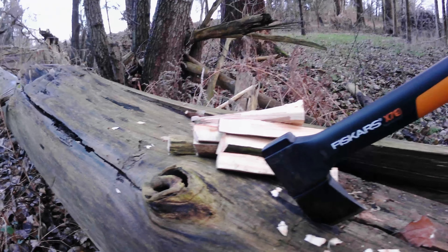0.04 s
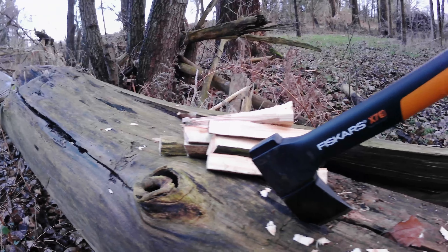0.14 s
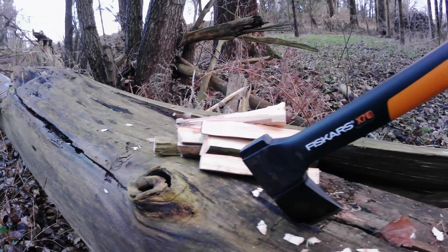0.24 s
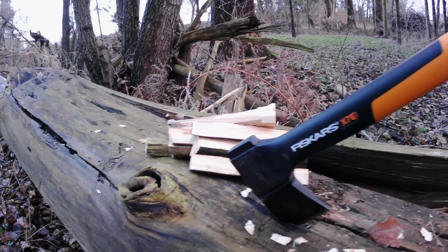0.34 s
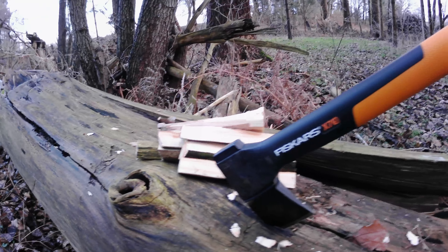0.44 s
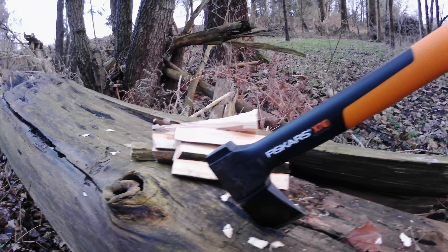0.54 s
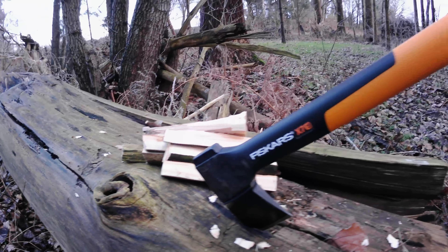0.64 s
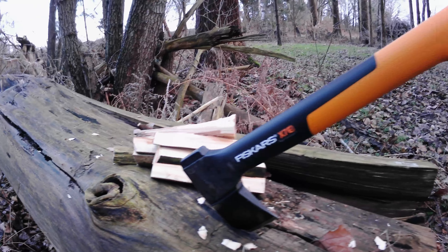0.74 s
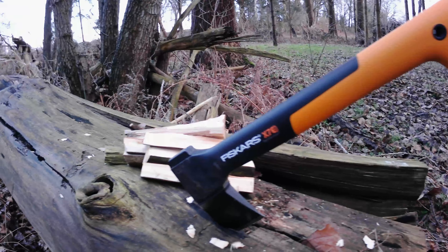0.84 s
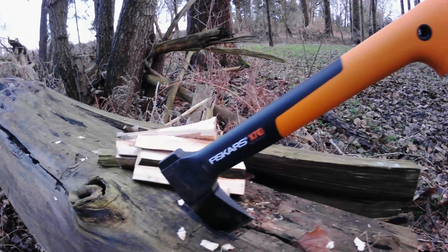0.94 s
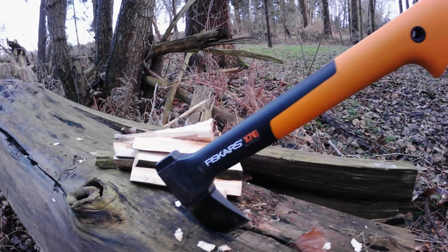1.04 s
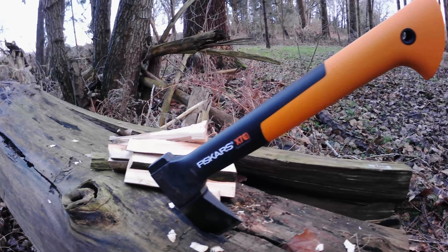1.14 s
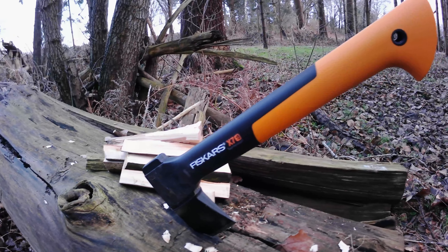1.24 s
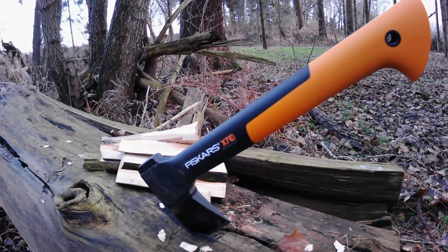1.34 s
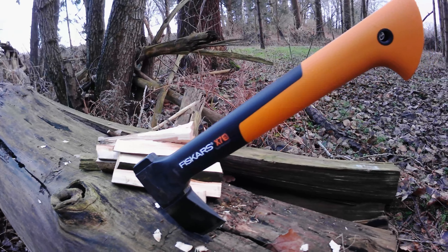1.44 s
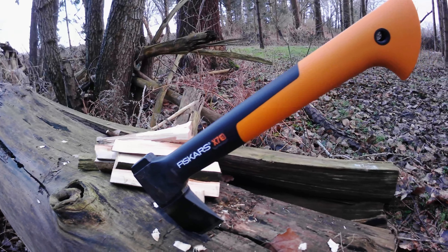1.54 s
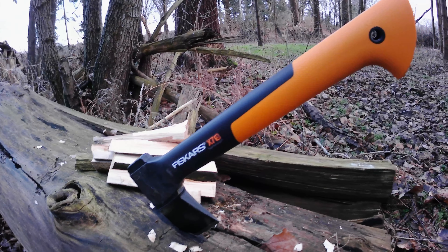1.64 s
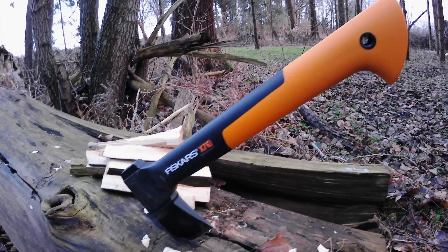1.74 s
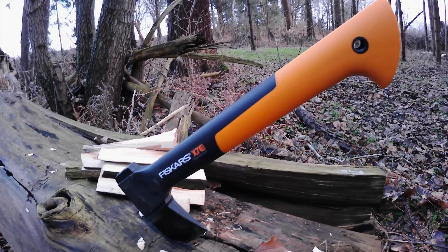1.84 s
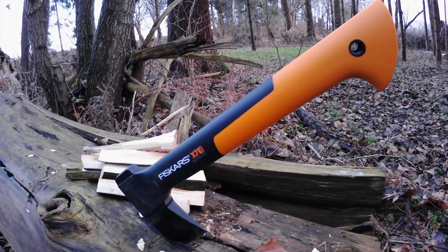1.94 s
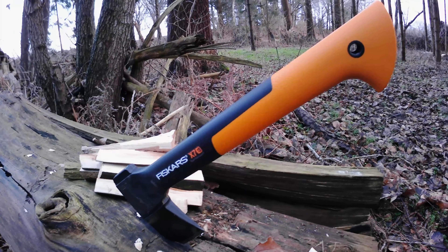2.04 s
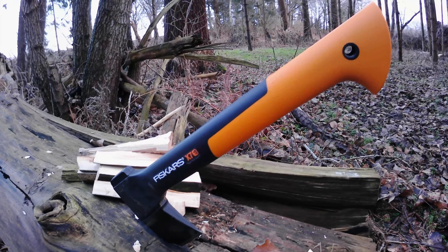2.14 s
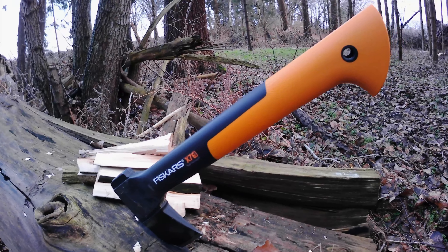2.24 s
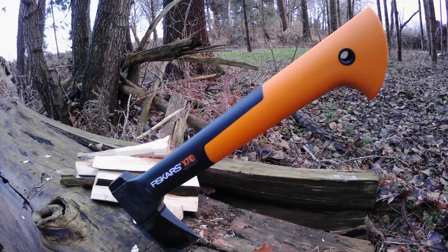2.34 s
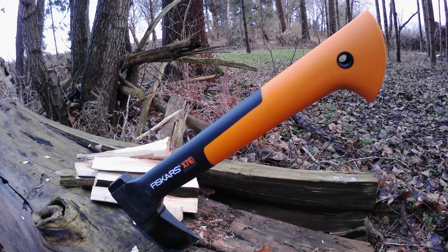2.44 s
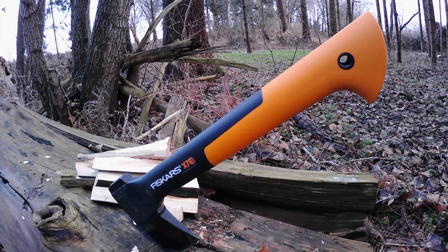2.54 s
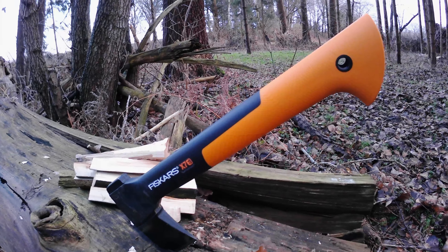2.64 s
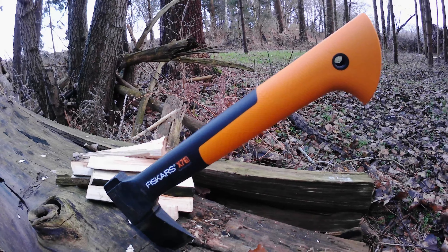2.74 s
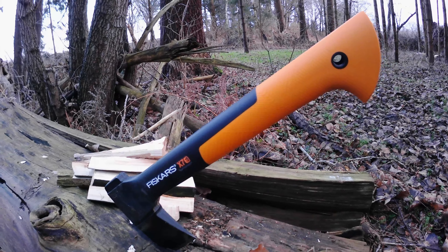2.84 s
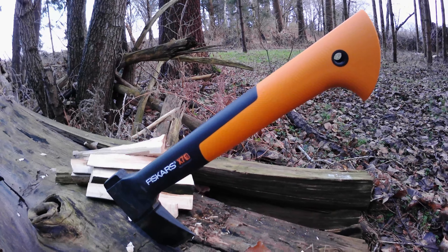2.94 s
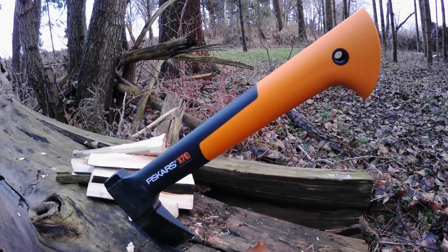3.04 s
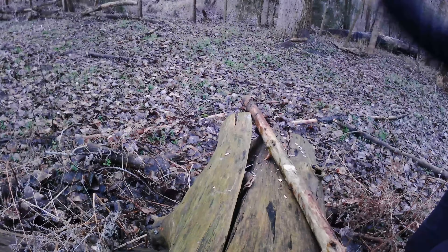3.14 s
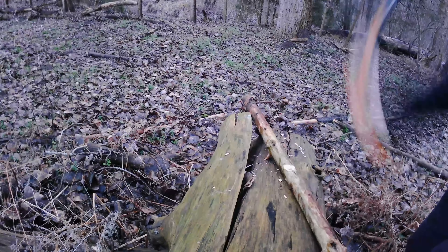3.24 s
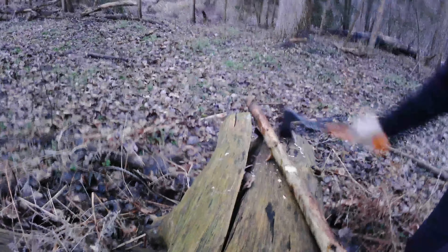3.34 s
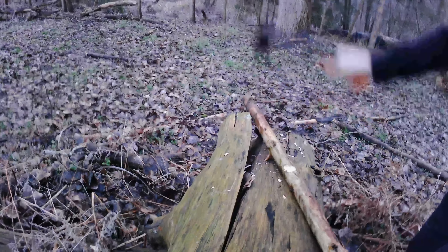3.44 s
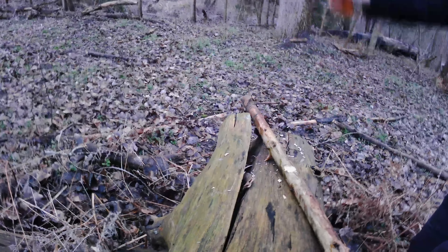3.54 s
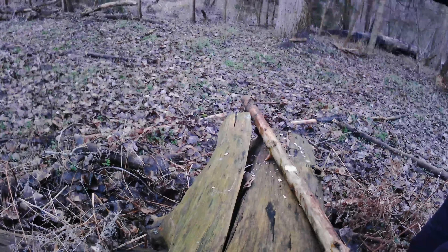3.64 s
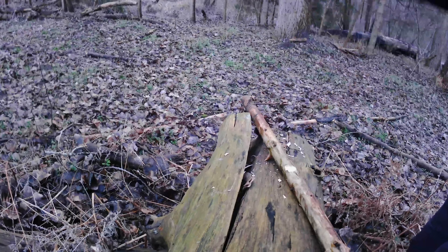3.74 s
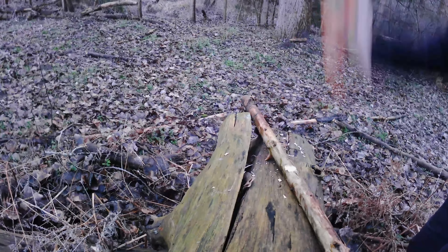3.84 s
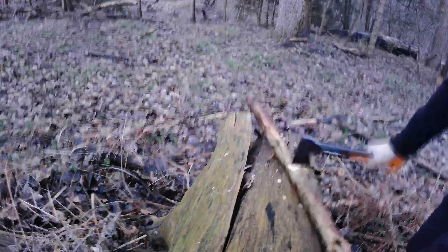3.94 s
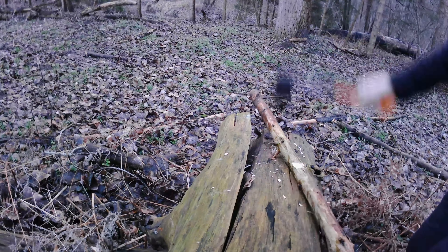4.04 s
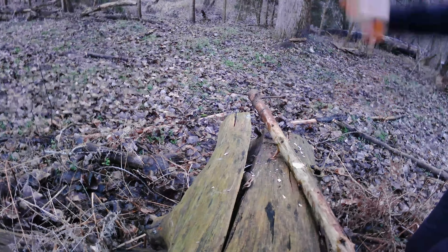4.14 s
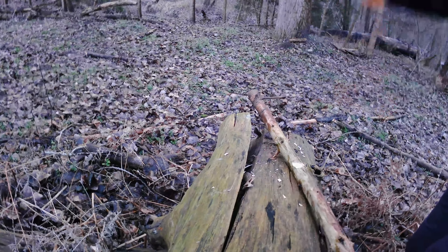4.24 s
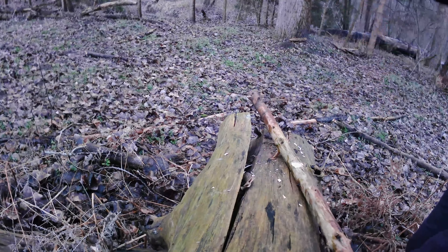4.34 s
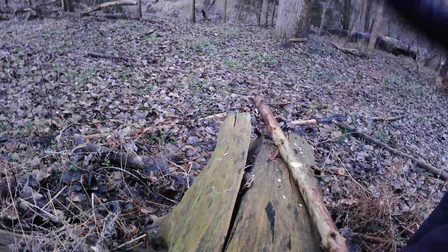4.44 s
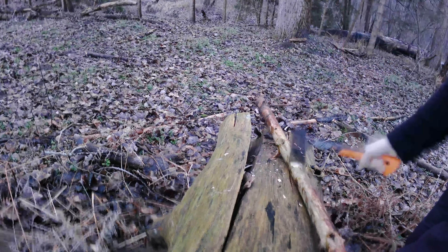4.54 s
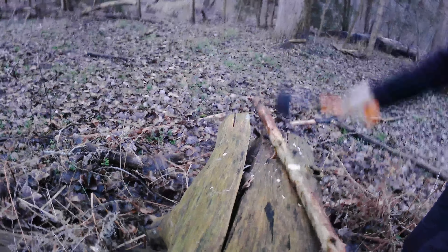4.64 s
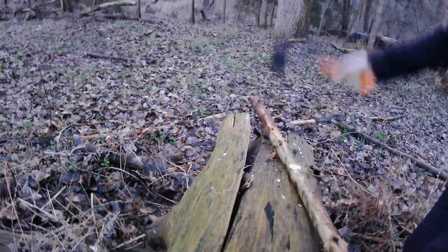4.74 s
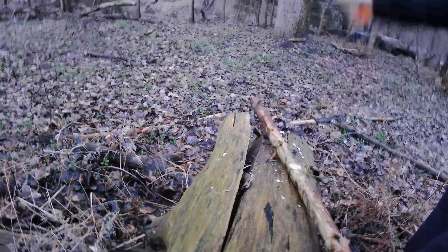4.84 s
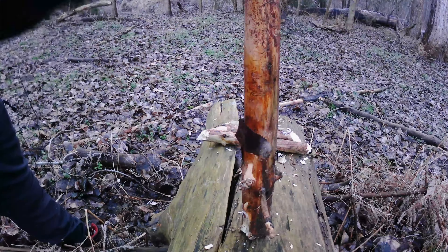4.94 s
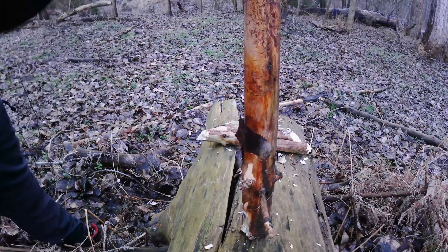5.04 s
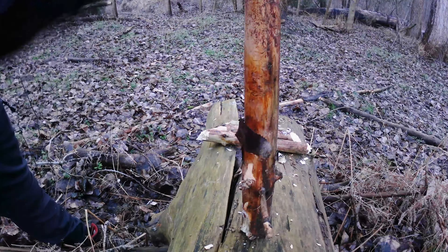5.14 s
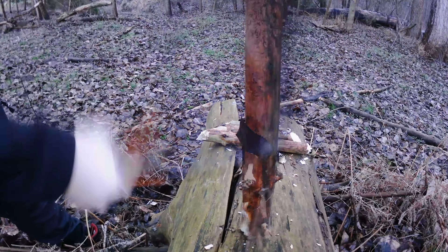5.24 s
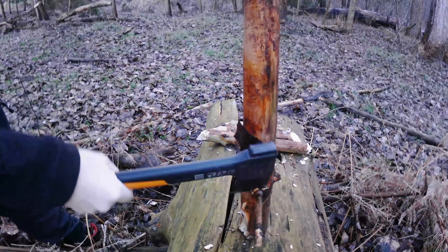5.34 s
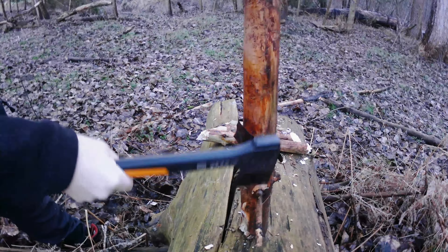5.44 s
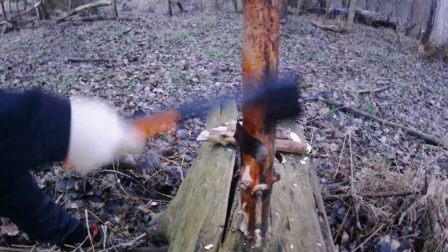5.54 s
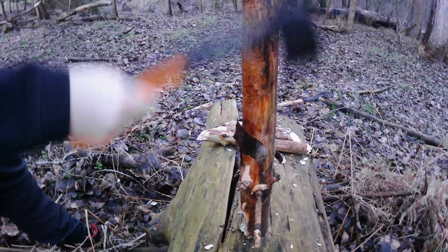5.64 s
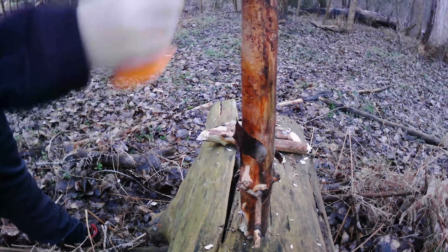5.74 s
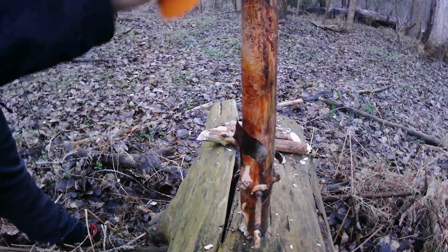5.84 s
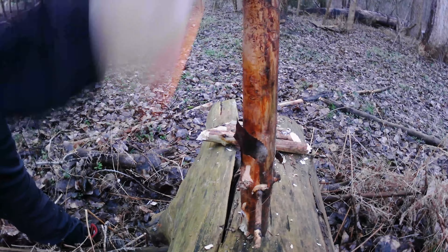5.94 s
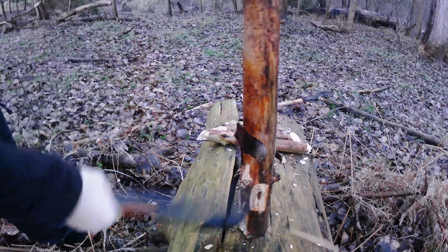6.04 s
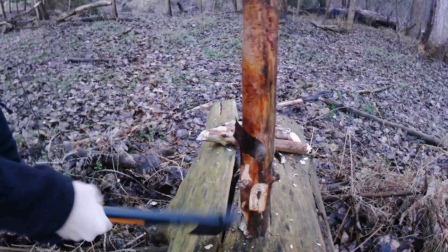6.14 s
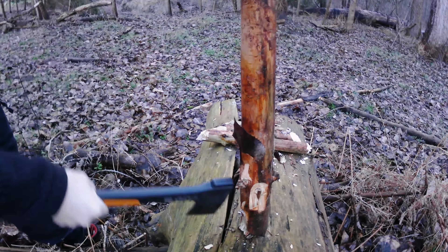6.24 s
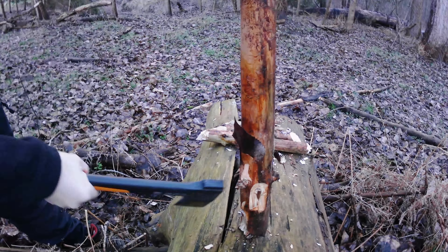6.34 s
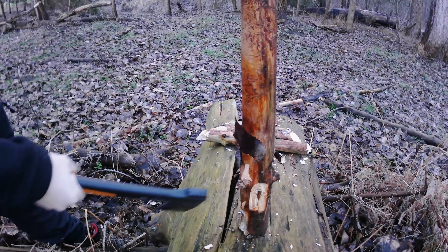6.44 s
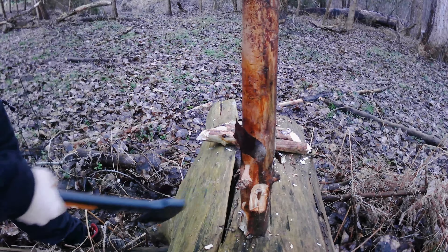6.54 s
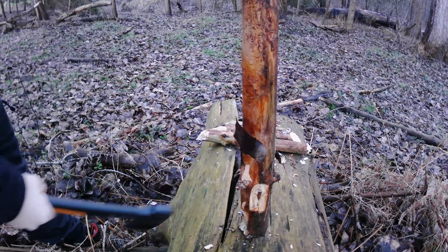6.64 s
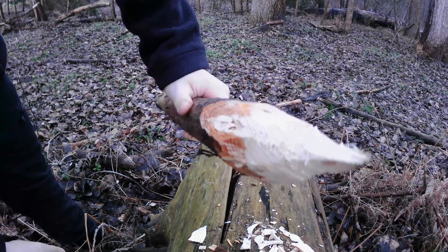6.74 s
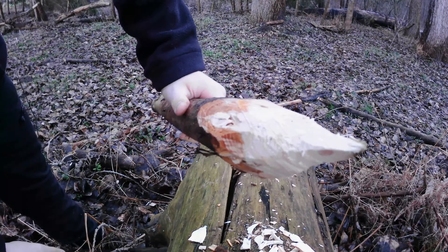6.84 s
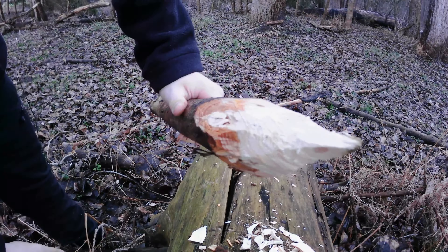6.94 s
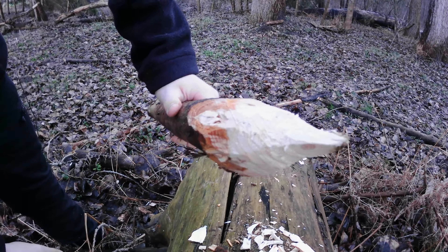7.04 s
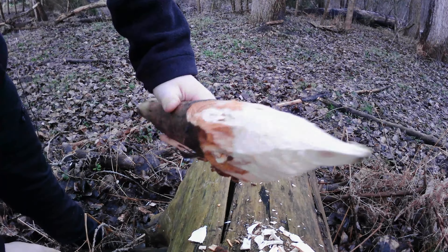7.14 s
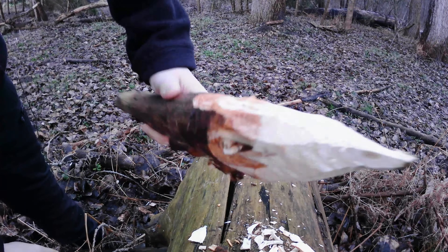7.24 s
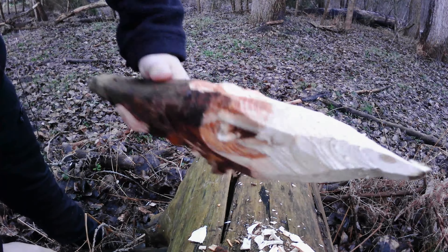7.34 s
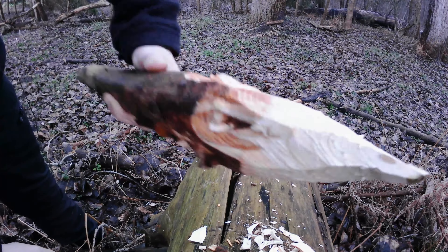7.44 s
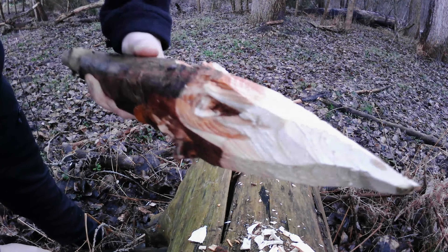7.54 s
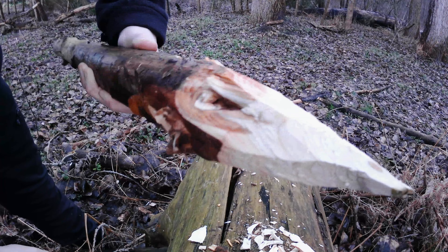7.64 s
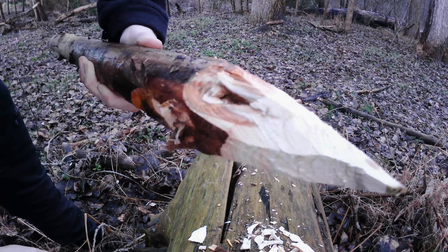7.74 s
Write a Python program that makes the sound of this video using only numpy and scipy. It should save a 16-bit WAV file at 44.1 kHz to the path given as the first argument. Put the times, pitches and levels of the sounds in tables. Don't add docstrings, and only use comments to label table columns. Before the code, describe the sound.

Faint outdoor hiss and a thin bird chirp, a sharp twig crack, brief silence, then hatchet blows on wood with clattering chips and a distant engine drone.

```python
import sys
import numpy as np
from scipy import signal
from scipy.fft import rfft, irfft
from scipy.io import wavfile
from scipy.ndimage import uniform_filter1d

SR = 44100
rng = np.random.default_rng(int(sys.argv[2]) if len(sys.argv) > 2 else 0)


def master_out(mix):
    frames = np.transpose(np.atleast_2d(mix))
    ceiling = np.clip(frames, -1, 1)
    pcm = np.round(ceiling * 32767).astype(np.int16)
    wavfile.write(sys.argv[1], SR, pcm)


def to_linear_factor(level_db):
    exponent = np.asarray(level_db, float) / 20
    return 10 ** exponent


N = 343759
T = np.arange(N) / SR

KNOCK_CRACK_T60_S = 0.019
# start in seconds, force in dB, push in ms, bite in ms, fibre crack in dB.
CHOPS = [
    (3.2759, 7.006, 0.54, 5.7, -4.5),
    (3.9276, 5, 0.73, 5.1, -10),
    (4.5764, 6.993, 0.45, 7.4, -2.5),
]


def decay(t, t60):
    return np.exp(-np.log(1000) * t / t60)


def coloured(size, spectrum):
    hz, db = np.transpose(spectrum)
    log_hz = np.log(np.fft.rfftfreq(size, 1 / SR) + 1)
    gain = to_linear_factor(np.interp(log_hz, np.log(hz), db))
    x = irfft(rfft(rng.standard_normal(size)) * gain, size)
    return x / x.std()


def add(out, s, sound):
    i = int(s * SR)
    out[i:i + len(sound)] += sound[:N - i]


def walk(rate):
    k = int(SR / rate)
    held = np.repeat(rng.standard_normal(N // k + 1), k)
    return 1.3 * uniform_filter1d(uniform_filter1d(held, k), k)[:N]


def tone(rows, harmonic, db_column):
    rows = np.transpose(rows)
    edge = np.clip(np.minimum(T - rows[0, 0], rows[0, -1] - T) / 0.015, 0, 1)
    phase = 2 * np.pi * np.cumsum(np.interp(T, rows[0], rows[1])) / SR
    level = np.sqrt(2) * edge * to_linear_factor(np.interp(T, rows[0], db_column))
    return level * np.sin(harmonic * phase)


def air():
    # frequency in Hz, level in dB per Hz.
    hiss_colour = [(12, -51.5), (20, -18), (55, -10), (96, -7), (172, -8.5), (261, -2.5), (420, -7.5),
                   (918, -7.5), (1480, -10.5), (2370, -27), (3220, -31), (5500, -37.5), (11700, -42.5),
                   (12600, -81)]
    # frequency in Hz, level in dB.
    wash_colour = [(20, -23.5), (50, -1), (110, 4), (190, 7), (300, -7.5), (500, -42), (2000, -90.5)]
    # start in seconds, level in dB.
    takes = [
        (0, -57),
        (3.1, -57),
        (4.961, -51),
        (6.78, -52),
    ]
    # centre in seconds, change in dB, half-width in seconds.
    swells = [
        (3.38, 10, 0.13),
        (4.1, 7, 0.13),
        (4.62, -2, .15),
        (6.5, 6, 0.17),
    ]
    starts, levels_db = np.transpose(takes)
    wash_db = levels_db[(np.searchsorted(starts, T) - 1).clip(0)]
    wash_db = wash_db + sum(db * np.exp(-((T - s) / width) ** 2) for s, db, width in swells)
    wash = coloured(N, wash_colour) * to_linear_factor(wash_db - 4.5 + 1.8 * walk(9.1))
    hiss = coloured(N, hiss_colour) * to_linear_factor(-50.13 + 0.15 * walk(0.42))
    return hiss + wash


def whine():
    # frequency in Hz, level in dB.
    comb = [(2825, -78), (4246, -83), (5652, -87), (7073, -83), (8490, -93), (9898, -87), (11319, -91)]
    clock = np.cumsum(1 + .0003 * walk(4)) / SR
    throb = 1 + .3 * np.exp(2j * np.pi * 17.5 * T)
    out = np.zeros(N)
    for hz, db in comb:
        level = np.sqrt(2) * to_linear_factor(db + .8 * walk(30))
        out += level * (throb * np.exp(2j * np.pi * hz * clock)).imag
    return out


def drones():
    # time in seconds, level in dB, third harmonic in dB.
    near_path = [
        (4.96, -44.5, -70),
        (5.23, -45, -63),
        (5.32, -54, -61.5),
        (5.55, -48, -54.5),
        (5.85, -47.5, -81),
        (6.29, -50.5, -62),
        (6.34, -44, -55.5),
        (6.59, -46, -49),
        (6.78, -39, -53.5),
    ]
    # time in seconds, pitch in Hz, level in dB.
    far_path = [
        (6.85, 188.8, -64.5),
        (7.1, 188, -55.5),
        (7.25, 188, -59.5),
        (7.6, 176.2, -63),
        (7.75, 184.6, -58.5),
    ]
    s, db, third_db = np.transpose(near_path)
    pitch_hz = 120 + 0.4 * rng.standard_normal(len(s))
    rows = np.transpose([s, pitch_hz])
    near = tone(rows, 1, db) + tone(rows, 3, third_db)
    far = tone(far_path, 1, np.transpose(far_path)[-1])
    return near * to_linear_factor(1.2 * walk(30)) + far * to_linear_factor(2.99 * walk(15))


def bird():
    # start in seconds, length in seconds, first pitch in Hz, last pitch in Hz, level in dB.
    calls = [
        (2.027, .02, 3540, 4200, -66),
        (2.056, 0.077, 3650, 4300, -57),
        (.39, .04, 5000, 5000, -76),
        (2.195, .045, 5000, 5000, -74),
    ]
    rise_s, sag_hz_per_s = 0.0117, 3500
    out = np.zeros(N)
    for s, length, first_hz, last_hz, db in calls:
        path = [(s, first_hz),
                (s + rise_s, (first_hz + last_hz) / 2),
                (s + 2 * rise_s, last_hz),
                (s + max(length, 2 * rise_s), last_hz - sag_hz_per_s * length)]
        out += tone(path, 0.99, db + np.array([-8, 0, -6, -12]))
    return to_linear_factor(3.5 * walk(150) - 1) * out


def trunks(x):
    # frequency in Hz, level in dB.
    echo_colour = [(100, -6), (300, -8), (800, -0.5), (1500, -4), (2500, -20.5), (4500, -24), (7000, -47.5),
                   (16000, -78.5)]
    echo_db, echo_t60_s = -5.5, 0.8
    t = T[:SR]
    tail = coloured(SR, echo_colour) * decay(t, echo_t60_s) * (1 - np.exp(-t / 0.012))
    return to_linear_factor(echo_db) * signal.fftconvolve(x, tail / np.sqrt(np.sum(tail ** 2)))[:N]


def litter():
    # start in seconds, level in dB, t60 in seconds, number of grains.
    showers = [
        (3.285, -30, .3, 190),
        (3.936, -34.5, .3, 180),
        (4.585, -37, 0.34, 170),
        (5.24, -34, .25, 180),
        (6.035, -32.5, .45, 170),
        (6.428, -47, 0.2, 150),
    ]
    # frequency in Hz, level in dB.
    grain_colour = [(300, -11), (1000, -1.5), (2000, -5.5), (2600, -2.5), (3400, -7.5), (4500, -5),
                    (5500, -27), (9000, -35), (16000, -72)]
    out, t = np.zeros(N), T[:SR // 2]
    grain = decay(t[:600], 0.004) * (t[:600] / 0.00037).clip(0, 1) ** 4
    for s, db, t60, grains in showers:
        when, size = rng.random((grains, 2)).T
        hits = np.zeros(len(t))
        places = (when ** 1.5 * t60 * SR).astype(int)
        np.add.at(hits, places, to_linear_factor(-3 * np.log(size.clip(.02))))
        patter = np.sqrt(signal.fftconvolve(hits ** 2, grain)[:len(t)].clip(0))
        add(out, s, to_linear_factor(db - 7) * decay(t, t60) * patter * coloured(len(t), grain_colour))
    return out


def chips(rows, middle_db, body_db, t60):
    out, t = np.zeros(N), T[:2048]
    shape = decay(t, t60) * (1 - np.exp(-t / 0.0012))
    for s, db, hz in rows:
        upper = coloured(len(t), [(1500, -35), (hz - 900, -14), (hz, -1), (hz + 500, -4), (hz + 900, -20),
                                  (7000, -24), (10500, -36), (16000, -75)])
        middle = coloured(len(t), [(1200, -30), (2100, -9), (2700, -1), (3300, -9), (5000, -30), (16000, -60)])
        body = coloured(len(t), [(500, -20), (1100, 0.5), (1700, 2), (2300, -6), (4000, -48.5), (16000, -63.5)])
        odd_db = 3 * rng.standard_normal(2)
        middle = to_linear_factor(middle_db + 4.5 + odd_db[0]) * middle
        body = to_linear_factor(body_db + odd_db[1]) * body
        add(out, s, to_linear_factor(db) * shape * (upper + middle + body))
    return out


def taps():
    # start in seconds, peak in dB.
    knocks_of_twigs = [
        (0.2292, -68),
        (6.1715, -61.5),
        (6.441, -54),
    ]
    twig_kind = (-2, 30, 0.02)
    return chips([(s, db, 4060) for s, db in knocks_of_twigs], *twig_kind)


def landings():
    # start in seconds, peak in dB.
    falls = [(3.4814, -57), (3.513, -54), (3.534, -55.5), (3.798, -46), (4.0422, -57), (3.915, -55),
             (4.2467, -57), (4.276, -50), (4.5107, -58), (4.811, -60), (4.839, -65), (4.9103, -56.5),
             (5.306, -49), (5.4674, -60), (5.725, -58), (6.3999, -61), (6.432, -54), (6.4766, -59),
             (6.577, -59.5), (6.6204, -63), (6.711, -65.5)]
    rows = [(s, db, 4060 + 300 * rng.standard_normal()) for s, db in falls]
    return chips(rows, middle_db=-8, body_db=18.4, t60=0.017)


def splinters():
    # start in seconds, peak in dB, ring in Hz.
    clatter = [(3.2914, -23.5, 3720), (3.3138, -34, 4200), (3.3463, -33.5, 4500), (3.3624, -45, 4440),
               (3.3698, -39.5, 3800), (3.3902, -47.5, 3840), (3.4624, -46.5, 3900), (3.9504, -37, 3500),
               (3.9642, -27, 4500), (3.9717, -34, 3830), (3.9854, -39, 4370), (3.9967, -37, 4170),
               (4.013, -41, 4300), (4.089, -52, 4300), (4.104, -52, 4000), (4.1684, -48, 4100),
               (3.5563, -53, 4000), (4.5975, -39, 3800), (4.6074, -30.5, 4450), (4.6144, -29.5, 3900),
               (4.6204, -33, 4180), (4.6258, -24.5, 4000), (4.6325, -33.5, 3750), (4.6483, -35, 4350),
               (4.6584, -30.5, 4320), (4.677, -45, 3530), (4.6863, -38.5, 4330)]
    return chips(clatter, middle_db=-6, body_db=0.5, t60=0.015)


def shavings():
    # start in seconds, peak in dB, ring in Hz.
    scrapes = [(5.2574, -38, 3700), (5.2769, -37.5, 3500), (5.2894, -53, 3200), (6.0367, -20, 5870),
               (6.0604, -36, 4080), (6.0764, -42, 4390), (6.0876, -48, 4160), (6.1037, -42, 4430),
               (6.111, -41.5, 4400), (6.123, -43, 4550), (6.1338, -41.5, 4200), (6.1639, -56, 4240),
               (6.1814, -49.5, 4500), (6.4474, -50.5, 5500), (6.452, -43, 3440), (6.458, -56, 7000)]
    return chips(scrapes, middle_db=-2.1, body_db=10, t60=0.018)


def bumps():
    # start in seconds, level in dB, pitch in Hz.
    thumps = [
        (6.375, -22.5, 190),
        (6.409, -27, 147),
        (6.463, -28, 130),
        (6.533, -28, 169),
        (6.613, -36, 199),
        (6.63, -34.5, 150.3),
        (6.685, -36, 159),
        (6.722, -30, 119),
        (6.753, -34.5, 150.2),
    ]
    out, t = np.zeros(N), T[:4096]
    for s, db, hz in thumps:
        shape = decay(t, 0.024) * (1 - np.exp(-t / 0.00037))
        add(out, s, to_linear_factor(db) * shape * np.sin(2 * np.pi * hz * t))
    return out


def chatter():
    # start in seconds, pitch in Hz, level in dB, length in ms.
    bursts = [(2.9139, 1045, 5.5, 0.94), (2.915, 1285, -2.5, 2.2), (3.2766, 1160, 3.5, 1.6),
              (3.2787, 341, 5, 5.6), (3.9287, 1210, 4, 1.1), (3.9302, 300, 0, 4.8),
              (4.5776, 1000, 4.5, 1.6), (4.5803, 398, 3.5, 3.6), (5.234, 1049, -0.5, 1.65),
              (5.236, 1400, 6.5, 3.5), (5.243, 600, -12, 2.5), (5.252, 1400, -25, 3.2),
              (5.2585, 801, -29, 2.2), (5.269, 498, -27, 3.3), (6.0277, 1247, 5.5, 2.6),
              (6.0311, 1285, 1.5, 3), (6.0478, 1400, -3.5, 1.9), (6.087, 600, -20.5, 3.4),
              (6.116, 500, -27, 3.4)]
    rise_ms = 0.25
    out, ms = np.zeros(N), T[:1024] * 1000
    for s, hz, db, length_ms in bursts:
        shape = (1 - np.exp(-ms / rise_ms)) * np.exp(-(ms / length_ms) ** 4)
        add(out, s, to_linear_factor(db) * shape * np.sin(2 * np.pi * hz * ms / 1000))
    return out


def thuds():
    # frequency in Hz, level in dB.
    dense_modes = [(120, -33), (200, -7.5), (400, -1), (700, -7.5), (1000, -13.5), (1500, -18), (2500, -44),
                   (16000, -81)]
    out, t = np.zeros(N), T[:SR // 2]
    shape = decay(t, 0.14) * (1 - np.exp(-t / 0.0013))
    for s, force_db, *_ in CHOPS:
        add(out, s, to_linear_factor(force_db - 11) * shape * coloured(len(t), dense_modes))
    return out


def bend():
    ms = (T - 2.9138) * 1000
    return -to_linear_factor(-2.5) * np.exp(-np.abs(ms) / np.where(ms < 0, 0.23, 0.1))


def blows(contacts, bodies, crack_t60):
    # frequency in Hz, level in dB.
    crack_colour = [(300, 7), (1000, -13.5), (2000, -9.5), (4000, 2), (7000, -6.5), (12000, -22.5),
                    (16000, -47)]
    out, fronts, t = np.zeros(N), np.zeros(N), T[:SR // 2]
    ms = t[:SR // 8] * 1000
    quick = signal.butter(2, 800, "high", fs=SR, output="sos")
    crack_shape = decay(t, crack_t60 / 4) + 0.031 * decay(t, crack_t60)
    crack_shape = crack_shape * (1 - np.exp(-t / 0.00087))
    for (s, force_db, push_ms, bite_ms, crack_db), modes in zip(contacts, bodies):
        push = np.sin(np.pi * np.clip(ms / push_ms, 0, 1))
        push = push / push.sum()
        bite = np.exp(-(ms / bite_ms) ** 4) + 0.03 * decay(ms / 1000, 1.5 * crack_t60)
        stutter = rng.standard_normal(len(ms)) * bite / np.sqrt(bite_ms * SR / 1000)
        force = to_linear_factor(force_db) * (push + 1.56 * signal.sosfilt(quick, stutter))
        ring = np.zeros(len(t))
        for k, (hz, t60, db) in enumerate(modes):
            fade = decay(t, 1.227 * t60) * np.exp(-(t / t60) ** 2)
            ring += (-1) ** k * to_linear_factor(db) * fade * np.sin(2 * np.pi * hz * t)
        crack = to_linear_factor(crack_db) * coloured(len(t), crack_colour) * crack_shape
        add(out, s, signal.fftconvolve(force, ring)[:len(t)] + crack)
        add(fronts, s, to_linear_factor(force_db) * push)
    radiated = signal.sosfilt(signal.butter(2, 100, "high", fs=SR, output="sos"), out)
    return np.array([radiated, fronts])


def snap():
    # start in seconds, force in dB, push in ms, bite in ms, crack in dB.
    breaks = [
        (2.9134, -3.5, 0.8, 2.2, 1),
    ]
    # frequency in Hz, t60 in seconds, level in dB.
    twig_modes = [(300, 0.03, -21.5), (446, 0.033, -27.5), (636, 0.004, -13), (1000, 0.008, -5.5),
                  (1400, 0.0098, -0.5), (1692, .016, -13), (2350, 0.0084, -12.5), (2730, 0.063, -44.5),
                  (3900, .035, -37), (4000, 0.0072, -2.5), (5010, 0.0048, -5), (7300, 0.0025, -13)]
    return blows(breaks, [twig_modes], crack_t60=0.019)[0]


def blade_ping():
    brush = (5.277, -22, 2, .5, -61)
    # frequency in Hz, t60 in seconds, level in dB.
    steel_modes = [(5200, .04, -21), (3600, .02, -28.5), (2400, .02, -23.5)]
    return blows([brush], [steel_modes], KNOCK_CRACK_T60_S)[0]


def knocks():
    # start in seconds, force in dB, push in ms.
    rocking = [
        (5.2441, -15, 1.1),
        (6.0338, -9.5, 1.9),
        (6.073, -13.5, 1.8),
        (6.085, -16.5, 1.5),
        (6.098, -18, 0.94),
        (6.106, -15, 0.87),
        (6.116, -18.5, 0.82),
        (6.129, -26, 0.73),
        (6.148, -26, 1.14),
    ]
    # frequency in Hz, t60 in seconds, level in dB.
    damped_modes = [(170, 0.08, -9.5), (213, 0.042, -4.5), (308.4, 0.1, -12), (430, 0.048, -6),
                    (540, 0.02, -10.5), (720, 0.021, -7), (1100, 0.01, -16), (1497, 0.02, -19.5)]
    contacts = [(s, db, push_ms, 1.9, db - 40) for s, db, push_ms in rocking]
    return blows(contacts, [damped_modes] * len(contacts), KNOCK_CRACK_T60_S)


def rebounds():
    # start in seconds, force in dB.
    jumps = [
        (3.2895, 2),
        (3.9435, -4),
        (4.5845, -7),
    ]
    # frequency in Hz, t60 in seconds, level in dB in rebound one, two and three.
    branch_modes = [(553, 0.07, -8.5, -9, -17), (664, 0.12, 0.5, -1.5, -14),
                    (701.7, 0.069, -4.5, -0.5, -16), (778, 0.043, -11.5, -21, -14),
                    (1686, .03, -14.5, -16, -15)]
    branch = np.array(branch_modes)
    contacts = [(s, db, 0.599, 1.8, -30.5) for s, db in jumps]
    bodies = [branch[:, [0, 1, k]] for k in (2, 3, 4)]
    return blows(contacts, bodies, KNOCK_CRACK_T60_S)


def trims():
    # start in seconds, force in dB, push in ms, bite in ms, crack in dB.
    slices = [
        (5.2338, -2.5, 0.44, 0.62, -7.5),
        (5.236, -1, 0.33, 2.8, 0),
        (6.027, 4, 0.45, 4.1, -9),
        (6.0488, -15, 0.59, 2.5, -40.5),
    ]
    # frequency in Hz, t60 in seconds, level in dB.
    stake_modes = [(172.1, 0.12, -16), (314, 0.29, -29.5), (547.7, 0.032, -4), (897.5, 0.013, -8.5),
                   (1354, 0.015, -2.5), (1770, 0.013, -6.5), (2060, .011, -10.5), (2360, 0.012, -16),
                   (2610, 0.01, -13.5), (3495, 0.014, -15), (5660, 0.017, -26.5)]
    return blows(slices, [stake_modes] * len(slices), crack_t60=0.037)


def chops():
    # frequency in Hz, t60 in seconds, level in dB in chop one, two and three.
    log_modes = [(138.7, 0.32, -32.5, -29.5, -25.5), (169.7, .26, -21.5, -19.5, -24.5),
                 (216.9, 0.2, -27.5, -22, -17), (310.8, 0.15, -14, -14, -16),
                 (334.5, 0.11, -6.5, -8, -22.5), (372.1, 0.13, -15.5, -12.5, -9),
                 (414.4, 0.13, -12, -3, -6), (472.6, .11, -10.5, -8.5, -11), (565.7, 0.072, -8, -3.5, -8.5),
                 (667, 0.07, -12, -16, -5), (713, 0.045, -12, -19, -10), (884.4, 0.033, -3.5, -8.5, -0.5),
                 (1000, 0.013, -6.5, -1, -1.5), (1232, 0.031, -7.5, -3, -12.5),
                 (1657.6, 0.035, -18.5, -17.5, -13), (1990, .022, -17.5, -26, -13.5),
                 (2696, 0.013, -17, -15.5, -26.5)]
    log = np.array(log_modes)
    return blows(CHOPS, [log[:, [0, 1, k]] for k in (2, 3, 4)], crack_t60=0.063)


def scene():
    background = air() + whine() + drones() + bird()
    debris = litter() + taps() + landings() + splinters() + shavings()
    wood, fronts = knocks() + rebounds() + trims() + chops()
    contact = bumps() + chatter() + thuds() + bend() + snap() + blade_ping()
    return (background + trunks(fronts) + debris + contact + wood)[None]


def band_limit(x):
    return signal.sosfilt(signal.butter(12, 15990, fs=SR, output="sos"), x)


def record(dry):
    cut_out_s, cut_in_s, fade_in_s = 3.083, 3.147, 0.022
    splice = np.clip(np.maximum((cut_out_s - T) / 0.0011, (T - cut_in_s) / fade_in_s), 0, 1)
    overloaded = np.clip(dry, -1, 1)
    dull = signal.sosfilt(signal.butter(4, 14000, fs=SR, output="sos"), overloaded)
    dull = signal.sosfilt(signal.ellip(8, 0.2, 60, 15800, fs=SR, output="sos"), dull)
    return band_limit(dull * splice)


dry = scene()
out = record(dry)
master_out(out)
```